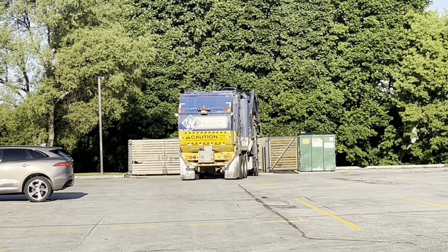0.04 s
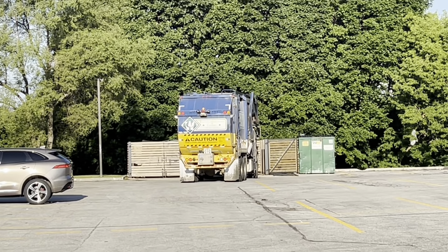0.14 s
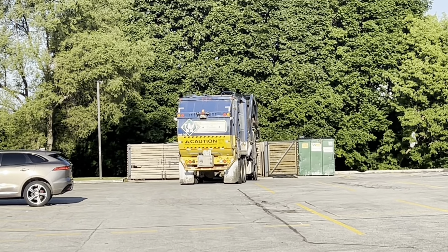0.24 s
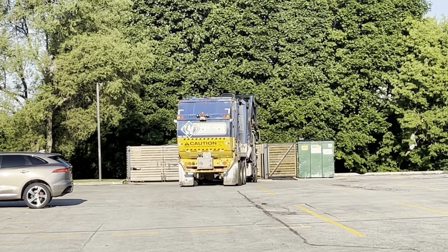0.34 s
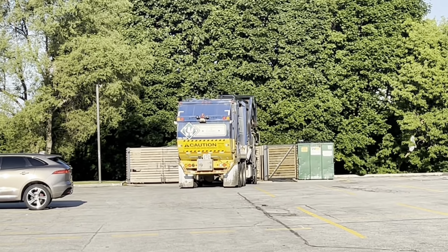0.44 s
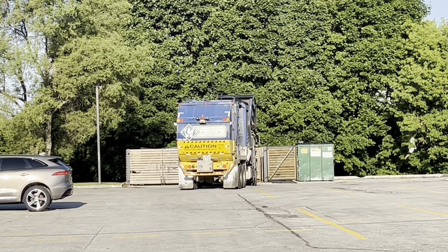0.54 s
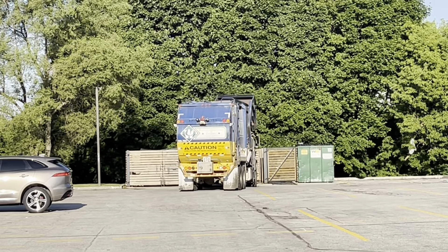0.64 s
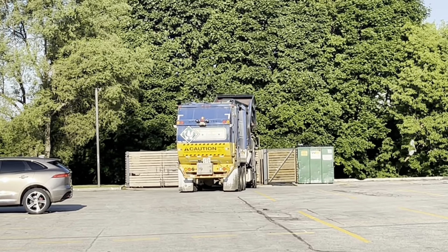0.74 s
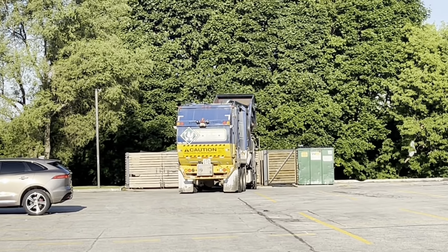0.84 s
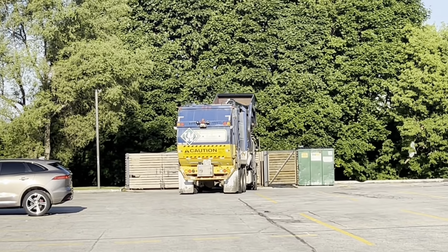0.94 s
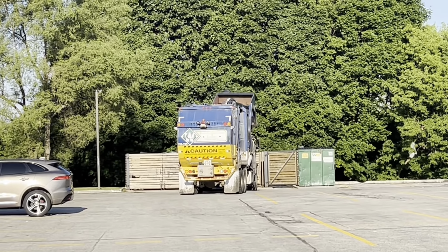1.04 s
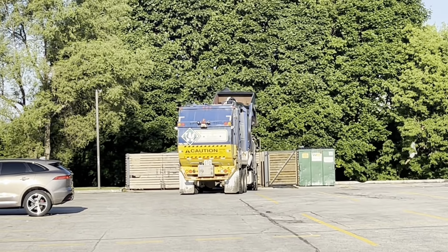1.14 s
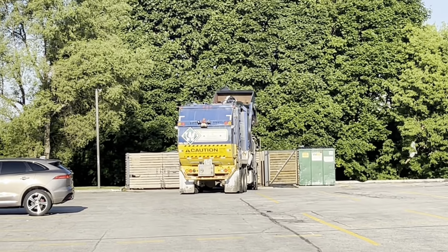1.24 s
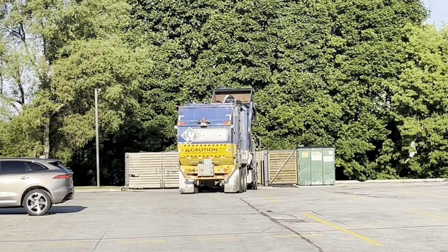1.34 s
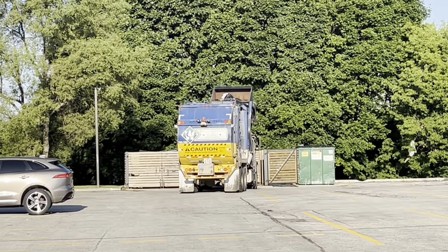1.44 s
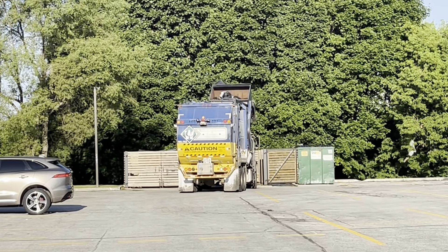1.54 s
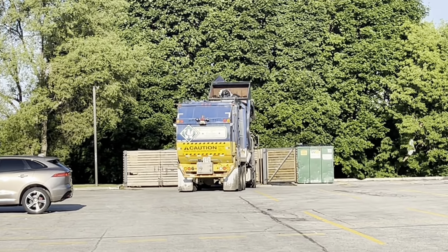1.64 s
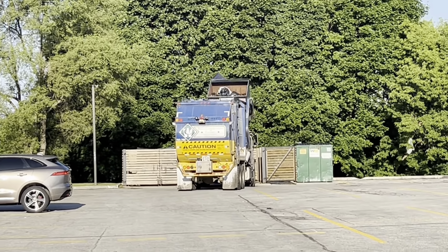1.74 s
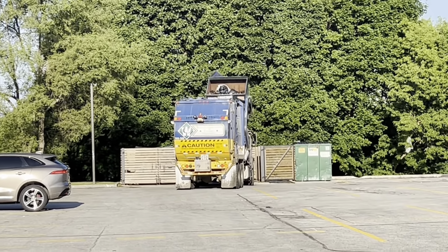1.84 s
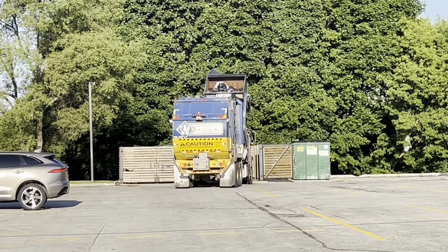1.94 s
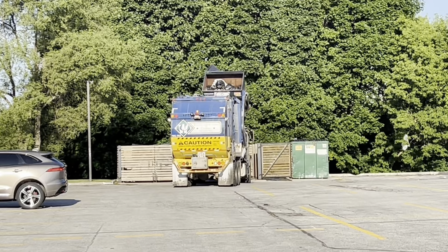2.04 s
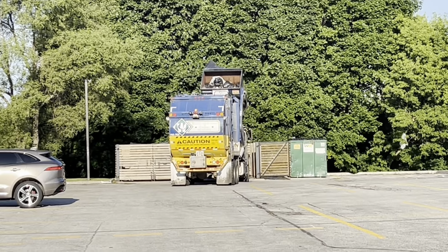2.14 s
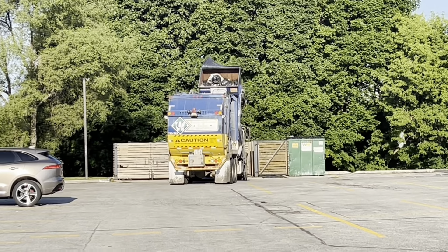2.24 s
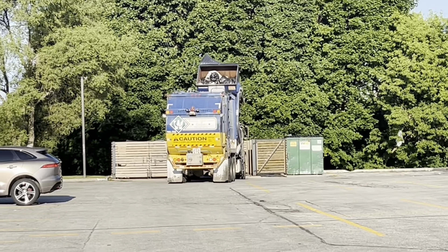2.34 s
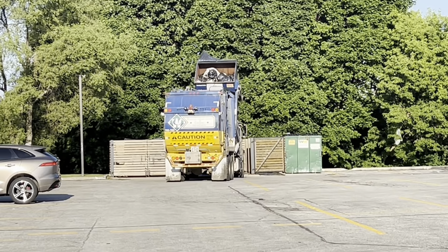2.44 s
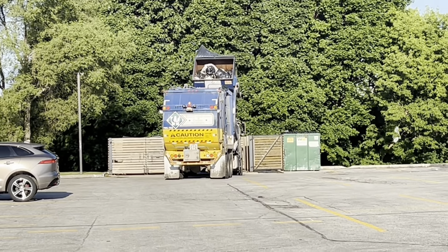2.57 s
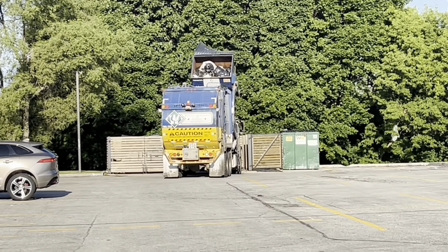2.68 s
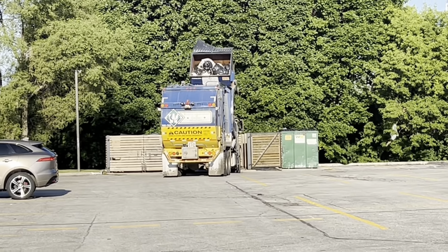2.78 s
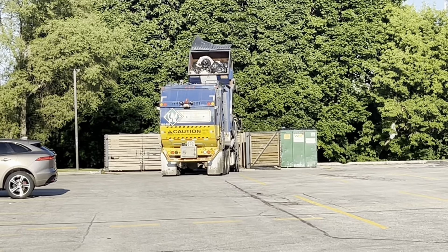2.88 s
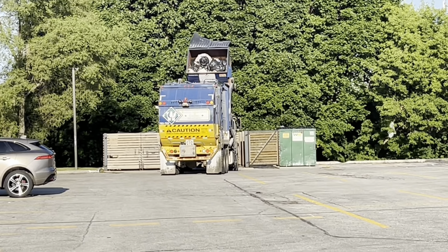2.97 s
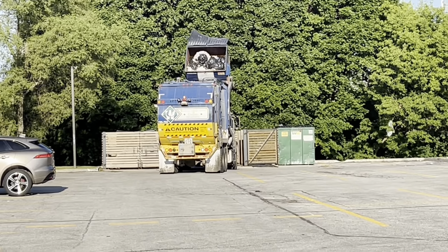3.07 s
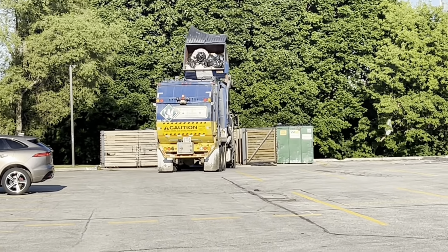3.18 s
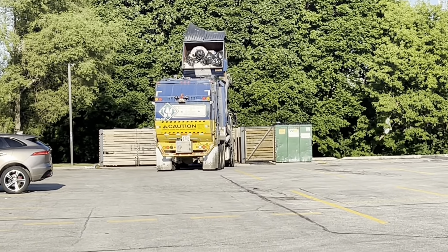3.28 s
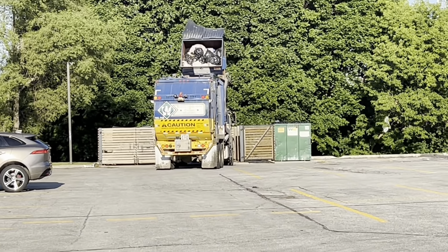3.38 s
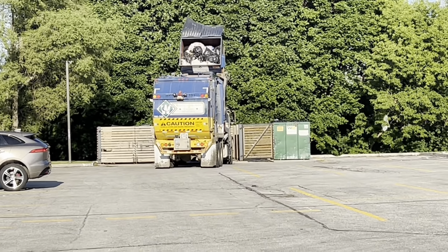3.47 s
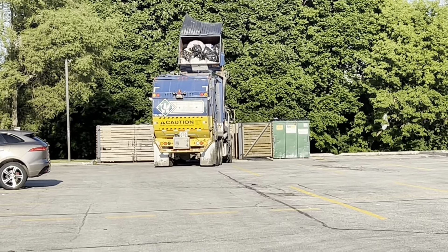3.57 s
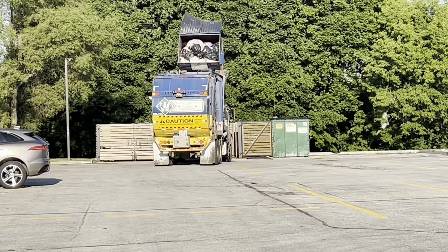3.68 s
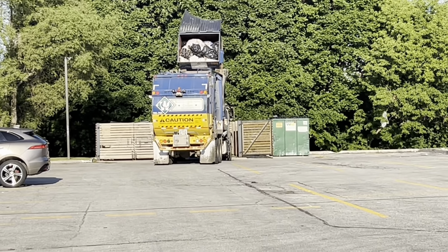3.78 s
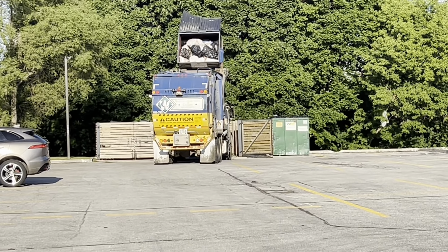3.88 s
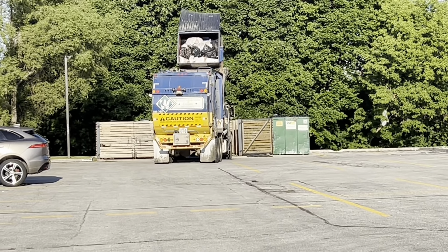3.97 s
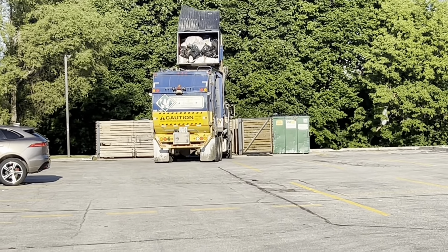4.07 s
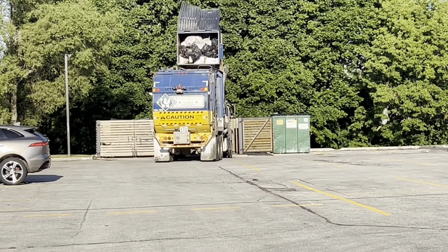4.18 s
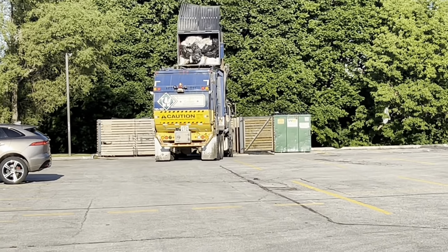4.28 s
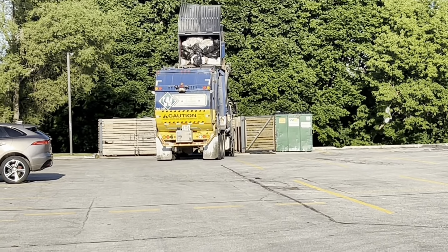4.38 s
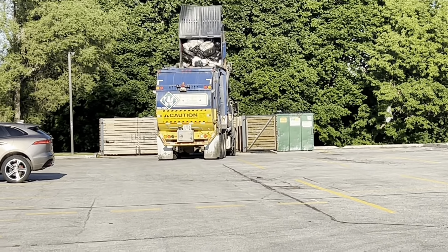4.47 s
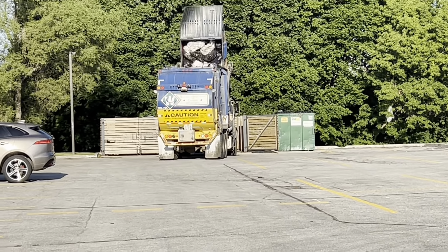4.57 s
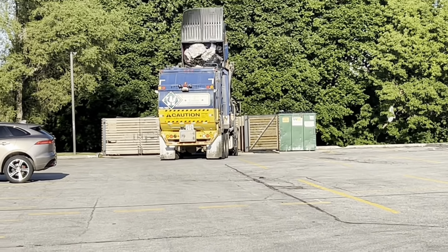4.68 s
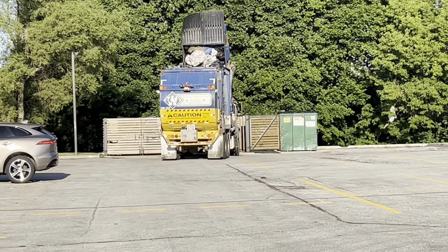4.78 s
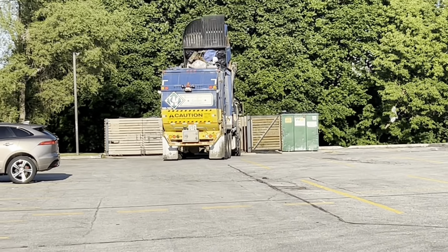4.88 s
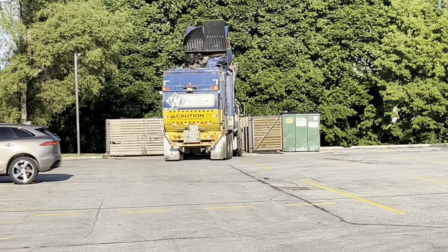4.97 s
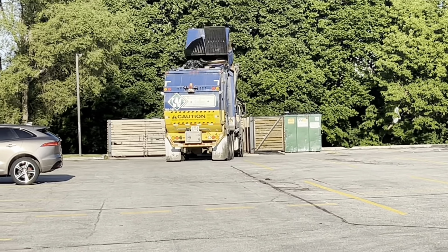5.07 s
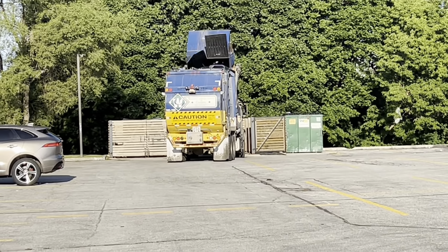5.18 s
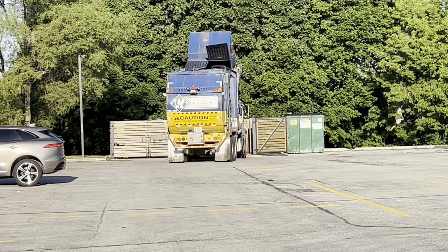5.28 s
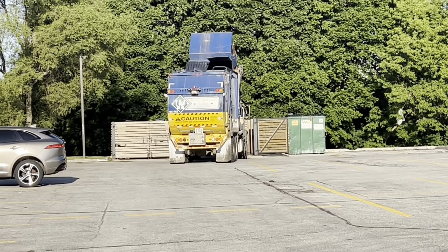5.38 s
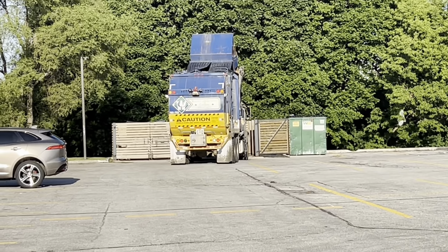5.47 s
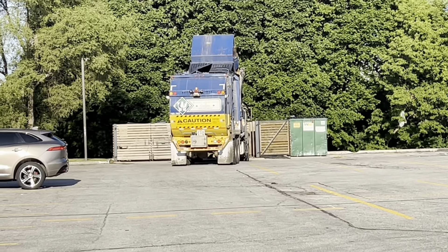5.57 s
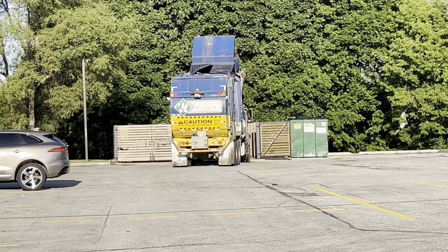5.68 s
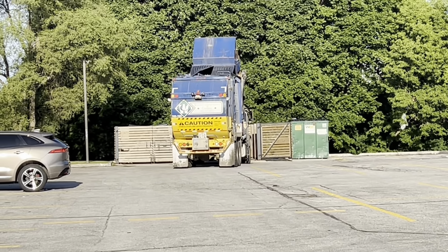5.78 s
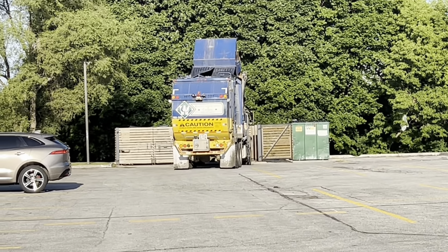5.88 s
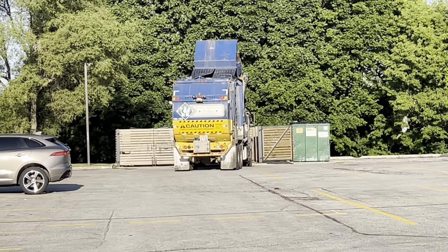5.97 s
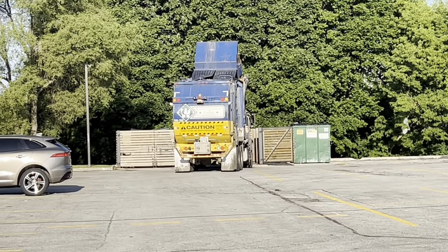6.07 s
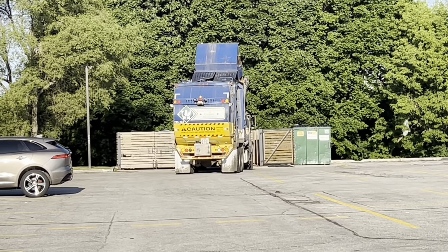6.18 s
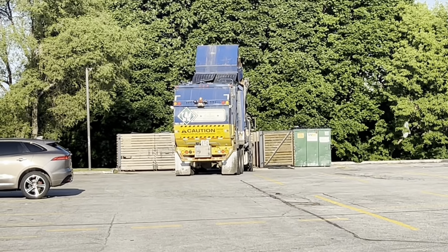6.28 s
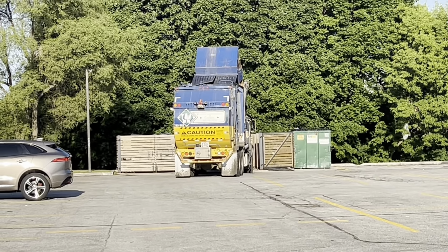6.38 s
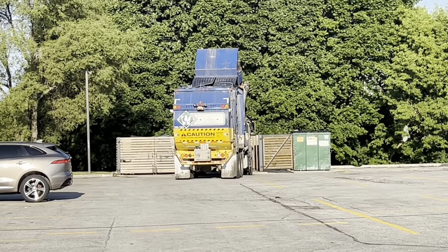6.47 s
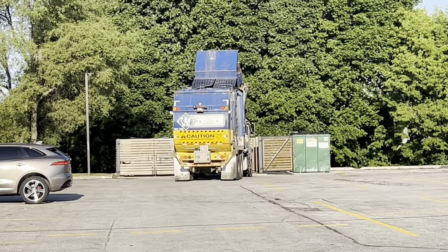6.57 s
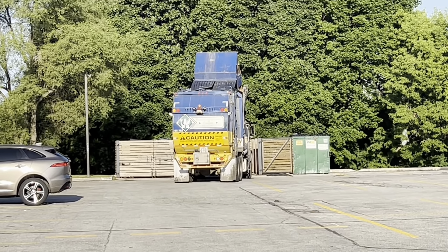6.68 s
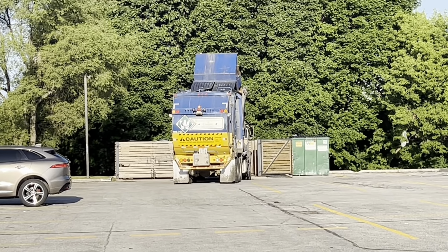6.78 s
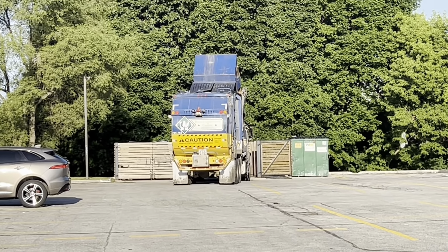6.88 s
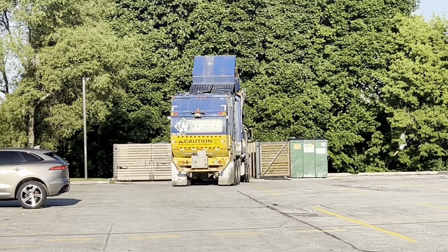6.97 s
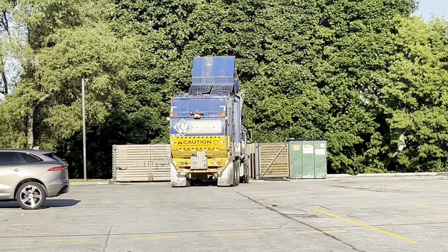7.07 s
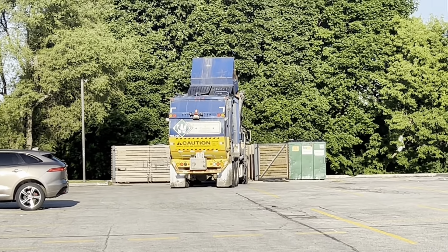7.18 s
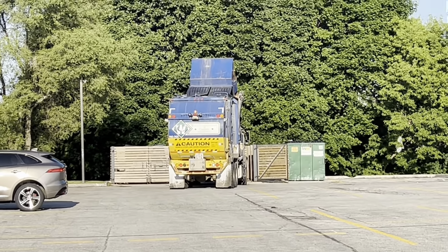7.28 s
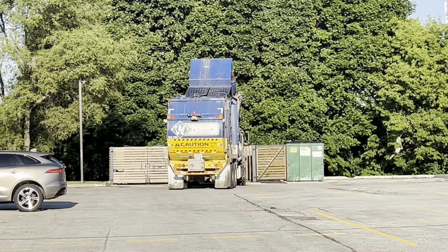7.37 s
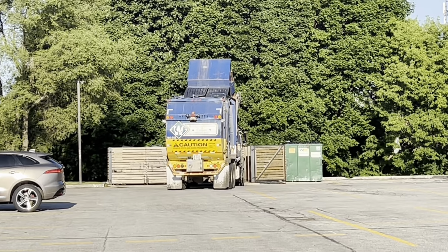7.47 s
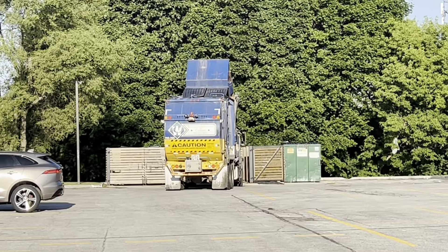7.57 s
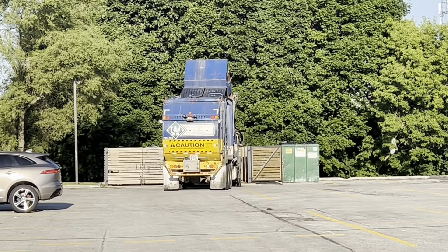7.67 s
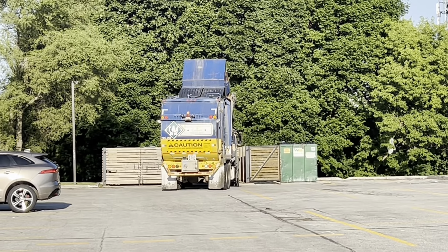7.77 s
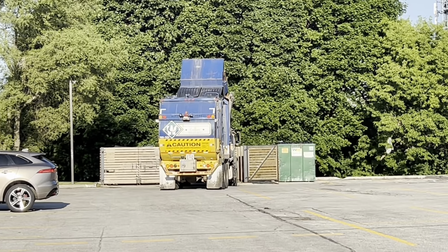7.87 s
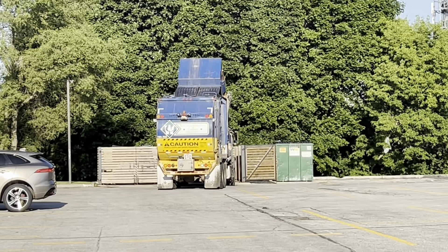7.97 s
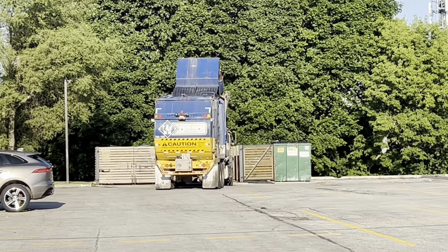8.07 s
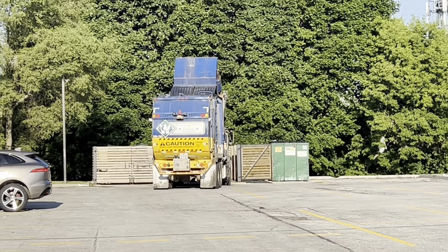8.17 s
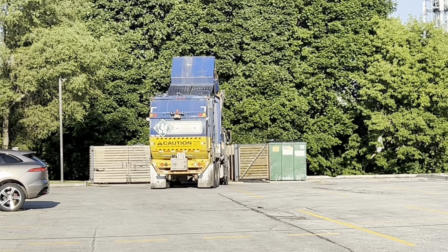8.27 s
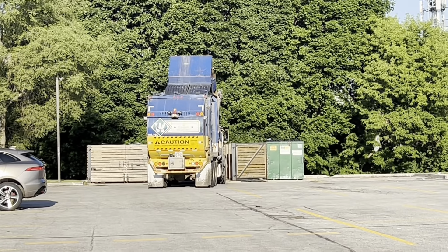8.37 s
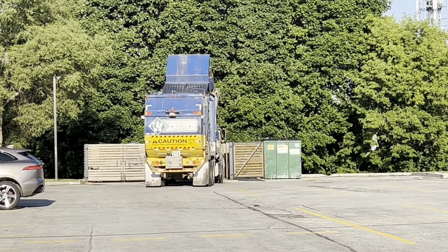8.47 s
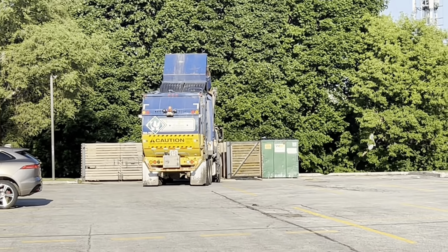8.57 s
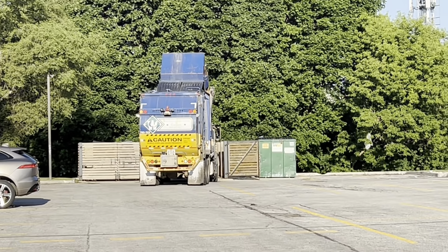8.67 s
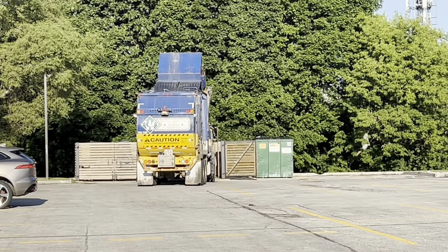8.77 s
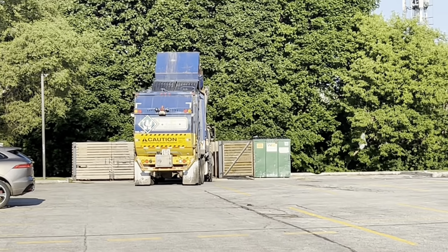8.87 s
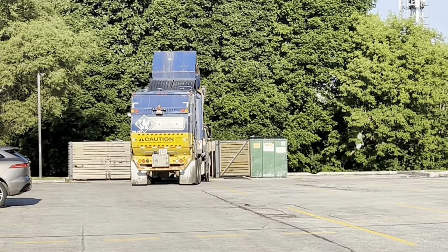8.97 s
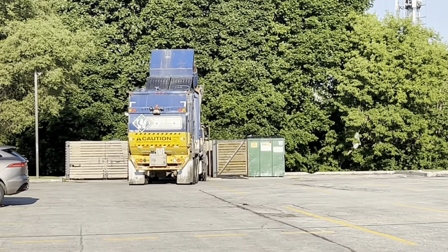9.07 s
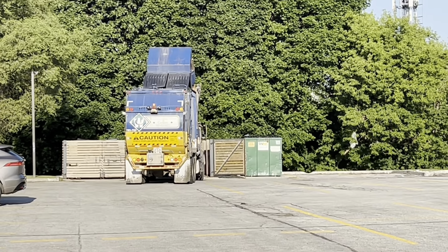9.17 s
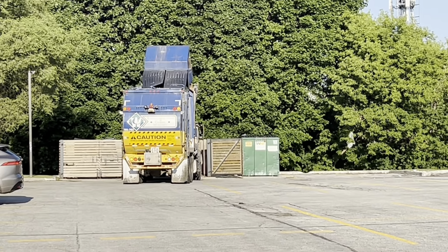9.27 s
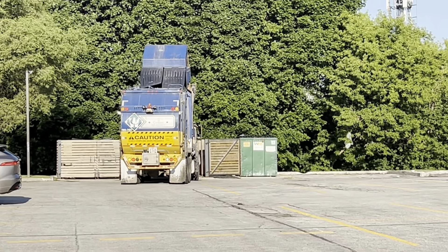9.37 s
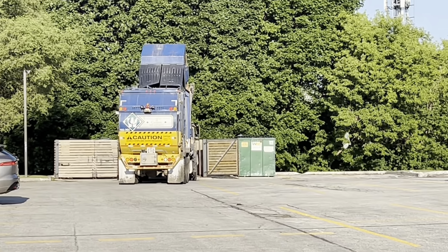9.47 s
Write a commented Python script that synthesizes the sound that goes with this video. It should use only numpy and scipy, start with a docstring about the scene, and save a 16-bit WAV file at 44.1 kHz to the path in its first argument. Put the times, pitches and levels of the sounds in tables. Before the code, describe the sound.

Phone capture outdoors facing a garbage truck: loud, rumbling diesel under load with body shudders, rasping stiff rails and short squeaks, thin valve hiss. A heavy boxy bang of the bin leads into a second, denser crash of lids, cans and scraps with ringing steel. Revs swell, then drop to soft idle with faint bird calls and small dry taps close by, ending on rising revs and sharp metallic clicks.

```python
"""A diesel garbage truck in a car park works its engine to lift a steel bin over its roof; rollers jerk in the rails.
Oil hisses through a valve, the load shifts, the bin bangs on the hopper, lids slam and rubbish slides out.
The engine speeds up, then drops to idle; a small bird calls; at the end the engine rises and steel clanks again.
Engine: filtered noise and tones locked to its firing. Steel: noise bursts and decaying modes. Rubbish: grains and
struck modes. Squeals and bird: gliding sines. Taps close by and sharp clicks in the closing steel clatter: resonated
noise bursts."""
import sys
import numpy as np
from scipy import signal
from scipy.fft import rfft, irfft, next_fast_len
from scipy.io import wavfile
from scipy.ndimage import uniform_filter1d

SR = 44100
rng = np.random.default_rng(int(sys.argv[2]) if len(sys.argv) > 2 else 0)


def waveform_to_disk(signal):
    """Save audio, clipped to [-1, 1], as 16-bit WAV at the path in sys.argv[1]."""
    frames = np.transpose(np.atleast_2d(signal))
    scaled = np.clip(frames, -1, 1) * 32767
    samples = np.round(scaled).astype(np.int16)
    wavfile.write(sys.argv[1], SR, samples)


N = 420273
T = np.arange(N) / SR

# relative spectrum of sliding rubbish [frequency_hz, density_db_per_hz]
RUBBISH_SPECTRUM = [(200, -10), (600, 1), (1300, 13), (1550, 6.5), (2250, 12.5), (3000, -1), (4900, 2),
                    (6500, -11.5), (8500, -28), (12000, -41), (16000, -52)]
# modes of the hopper and the lids that fall on it [frequency_hz, relative_level_db, t60_s]
HOPPER_MODES = [(915, -12, .2), (1130, -9, .2), (1215, -5, .2), (1272, -4, .22), (1368, -7, .25),
                (1660, -12, .2), (1830, -10, .2), (2120, -8, .2), (2257, -7, .3), (2490, -10, .2),
                (2650, -11, .2), (3610, -15, .25), (3820, -16, .25), (3985, -14, .25), (4720, -13, .25),
                (4935, -14, .25), (5490, -19, .2), (6210, -22, .2), (6510, -19, .2)]


def amp(db):
    """Logarithmic level: decibels to an amplitude ratio."""
    return 10 ** (np.asarray(db) / 20)


def unit(x):
    """Power normalisation: scale to rms 1."""
    return x / np.sqrt(np.mean(x ** 2) + 1e-18)


def colour(x, points):
    """Minimum-phase filtering through (Hz, dB) points, falling 20 dB per octave beyond the last."""
    size = 8192
    hz, db = np.transpose(points)
    octave = np.log2(np.arange(size // 2 + 1) * SR / size + 1)
    gain_db = np.interp(octave, np.log2(hz), db) - 20 * np.maximum(octave - np.log2(hz[-1]), 0)
    # folding the cepstrum onto positive times makes the response causal
    cepstrum = irfft(np.log(amp(gain_db)))
    cepstrum[1:size // 2] *= 2
    cepstrum[size // 2 + 1:] = 0
    response = irfft(np.exp(rfft(cepstrum)))
    return signal.oaconvolve(x, response)[:len(x)]


def resonance(x, hz, q):
    """Simple resonance: a band-pass with gain 1 at its centre."""
    return signal.lfilter(*signal.iirpeak(min(hz, SR / 3), max(q, .5), fs=SR), x)


def treble(x, db, corner_hz=3500):
    """First-order shelving: lift or lower what lies above the corner."""
    high = signal.lfilter(*signal.butter(1, corner_hz, "high", fs=SR), x)
    return x + (amp(db) - 1) * high


def noise(count=N):
    """White noise: equal mean power at every frequency."""
    return rng.standard_normal(count)


def walk(rate):
    """Band-limited chance: smoothed random steps, rate per second, with a spread near 1."""
    k = max(int(SR / rate), 1)
    return 1.16 * uniform_filter1d(noise()[np.arange(N) // k], k)


def swell(s, length, rise_s, fall_s):
    """Exponential envelope: builds up from s, holds for its length and dies away."""
    age = np.maximum(T - s, 0)
    fall = np.minimum(np.maximum(age - length, 0) / fall_s, 20)
    return (1 - np.exp(-age / rise_s)) * np.exp(-fall)


def spread(mid, side, width):
    """Mid-side stereo: direct sound plus coloured, unrelated reflections of opposite sign at the two ears."""
    return mid + colour(side, width) * np.array([[1], [-1]])


def engine():
    """Periodic excitation: firings drive exhaust and block, pump tones keep in step, and level follows speed."""
    # speed of the six-cylinder diesel [time_s, firing_hz]
    speed = [(0, 54.8), (1.3, 54.7), (2.2, 55.8), (3.3, 56.8), (4.2, 55.5), (4.7, 55.5), (5.15, 63.5),
             (5.45, 62), (5.8, 48), (6.2, 35.3), (8.8, 35.0), (9.1, 37), (9.53, 47)]
    # engine and pump tones [multiple_of_firing_rate, relative_level_db]
    orders = [(1, -2), (2, -10), (3.435, -6), (4.5, -15), (5.17, -12.5), (6, -5.5), (7, -14.5),
              (10.2, -22.5), (10.5, -24.5), (12, -20.5), (13.55, -22), (21.4, -25), (22.5, -25.5)]
    # relative spectra of exhaust drone, body rumble, combustion clatter, oil [frequency_hz, density_db_per_hz]
    drone_spectrum = [(90, -11.5), (140, -1), (190, -2), (215, -2), (250, 1.5), (300, -5.5), (370, -12),
                      (450, -14), (560, -26), (900, -65.5)]
    rumble_spectrum = [(20, -48), (35, 0.5), (52, 11.5), (70, 12), (110, 4.5), (140, -11.5), (200, -4.5),
                       (400, -65.5)]
    clatter_spectrum = [(250, -9), (430, -1), (510, -3), (580, 1.5), (650, -1.5), (750, 0), (980, -7.5),
                        (1250, -6.5), (1430, -10), (1650, -8.5), (1900, -10), (3200, -18), (5000, -33.5),
                        (8000, -46), (11000, -69)]
    oil_spectrum = [(1000, -3.5), (2500, -1.5), (4000, 0.5), (6000, -5.5), (8000, -15), (12000, -24.5),
                    (16000, -37.5)]
    # spread of the engine between the ears [frequency_hz, side_minus_mid_db]
    engine_width = [(60, -21.5), (200, -17.5), (380, -8.5), (700, -3.5), (1000, -1.5), (1500, 2),
                    (2000, -9), (3000, -17.5), (4600, -20), (8000, -16), (13000, -17)]

    hz = np.interp(T, *np.transpose(speed))
    octaves = np.log2(hz / 55.5)  # from working speed
    slope_hz_s = np.gradient(hz) * SR
    # extra fuel while speeding up; tones die away off the throttle
    pull_db = 0.0872 * uniform_filter1d(np.maximum(slope_hz_s, 0), SR // 5)
    overrun_db = .2 * uniform_filter1d(np.minimum(slope_hz_s, 0), SR // 5)
    exhaust_db = 10.5 * octaves + pull_db
    clatter_db = -37.5 + 6 * octaves + pull_db
    hiss_db = -55 + 14 * octaves
    hum_db = -40.5 - 1.5 * octaves
    rocking, buzzing = shudders()
    # exhaust drone added by a shudder under load
    strain = rocking * amp(-3 + 10.5 * octaves)

    turns = np.cumsum(hz * (1 + 0.0028 * walk(9))) / SR  # counted in firings
    firing, phase = turns.astype(int), turns % 1
    # six unequal cylinders, with a random part at each firing
    cylinder_db = np.array([0.079, 0.29, 0.63, 0.52, 0.23, -0.47])
    strength = amp(cylinder_db[firing % 6] + 0.73 * noise()[firing])
    pulses = unit(np.diff(firing, prepend=0) * strength)
    knock = unit(strength * (np.exp(-phase) + 7.7))  # mostly steady, with a decay after each firing
    tones = sum(amp(db + 3 * walk(5)) * np.sqrt(2) * np.sin(2 * np.pi * k * turns + .6 * walk(9))
                for k, db in orders)
    # the pump's whine swells with a shudder
    whine = amp(-7.5) * strain * np.sqrt(2) * np.sin(2 * np.pi * 3.435 * turns + walk(7.8))

    def roar(thump):
        """Source and filter: drone, rumble, panel hum, clatter and oil hiss along one path."""
        drone_level = np.hypot(amp(exhaust_db - 27.5), strain)
        drone = drone_level * unit(colour(knock * noise() + thump, drone_spectrum))
        rumble_level = np.hypot(amp(-29), rocking)
        rumble = rumble_level * unit(colour(knock * noise() + thump, rumble_spectrum))
        panels = resonance(resonance(noise(), 103.5, 2.1), 103.5, 2.1)
        hum = np.hypot(amp(hum_db), buzzing) * unit(panels)
        clatter = amp(clatter_db) * unit(colour(knock * noise(), clatter_spectrum))
        hiss = amp(hiss_db + 0.85 * walk(30)) * unit(colour(noise(), oil_spectrum))
        return drone + rumble + hum + clatter + hiss + valve()

    direct = roar(0.19 * pulses) + amp(exhaust_db - 32 + overrun_db) * tones + whine
    return spread(direct, roar(0), engine_width)


def shudders():
    """Transient vibration on springs: strength of the extra rumble and panel hum while the body rocks."""
    # rocking of the body [start_s, length_s, rumble_db, panel_hum_db]
    rocks = [(0, 0.15, -28.5, -46), (1.43, 0.34, -23, -25), (1.89, 0.3, -24.5, -46),
             (2.523, 0.26, -37.5, -24.5), (3.237, 0.32, -26, -27), (4.098, 0.13, -28, -51),
             (4.61, 0.54, -47, -25), (5.603, 0.59, -29.5, -34), (6.194, 0.68, -26.5, -24.5),
             (7.53, 1.15, -37, -29), (8.847, 0.77, -30, -56)]
    shapes = np.array([swell(s, length, rise_s=.045, fall_s=.11) for s, length, _, _ in rocks])
    return amp(np.transpose(rocks)[2:]) @ shapes


def valve():
    """Turbulent flow noise: a thin hiss of oil throttled through the tipping valve."""
    # flow through the valve [start_s, length_s, level_db]
    strokes = [(3.196, .45, -57.5), (3.625, 1.8, -54.5), (8.895, .7, -54.5)]
    # relative spectrum of the hiss [frequency_hz, density_db_per_hz]
    hiss_spectrum = [(2000, -6.5), (4200, 2.5), (6000, -2), (8000, -12), (12000, -15.5), (16000, -18)]
    flow = sum(amp(db) * swell(s, length, rise_s=.17, fall_s=.12) for s, length, db in strokes)
    return flow * unit(colour(noise(), hiss_spectrum))


def clanks():
    """Superposition: the blows, rubbish, scrapes and squeals of the lift, the bin and the hopper."""
    # modes of the steel bin [frequency_hz, relative_level_db, t60_s]
    bin_modes = [(140, 2, .55), (291, -7, .6), (430, -12, .6), (592, -16, .9), (745, -7, .7), (825, -1, .7),
                 (848, -6, .5), (1061, -14, .8), (1129, -9, .7), (1282, -6, .6), (1366, -6, .6),
                 (1645, -14, .9), (2211, -6, .8), (2255, -11, .9), (2570, -10, .7), (2665, -17, .6),
                 (3157, -16, .7), (3295, -10, .6), (3996, -20, .8), (4335, -20, .9), (4723, -17, .7),
                 (4930, -15, .6), (5035, -12, .4), (5104, -14, .5), (5215, -12, .5), (6110, -20, .4)]
    bin_blows = blows(bangs(), bin_modes, detune=.008, ring_db=-15, chatter_db=2.8, panel_tail_db=-11)
    hopper_blows = blows(slams(), HOPPER_MODES, detune=.015, ring_db=-9, chatter_db=3.2, panel_tail_db=-8)
    return bin_blows + hopper_blows + rubbish() + rails() + squeals()


def bangs():
    """Nonlinear impact: heavier bangs of the bin are brighter; columns as blows() takes them."""
    # the whole bin against the lift and the hopper [start_s, level_db, boom_db, panel_hz, fade_s]
    bin_hits = [(2.59, -61, 33, 800, .047), (4.609, -19.5, 3, 820, 0.021), (4.619, -27, 15.5, 1240, 0.024),
                (4.646, -21.5, 0, 816, .024), (4.662, -37, 7, 1320, 0.016), (4.698, -29, 9, 2230, 0.023),
                (4.737, -34, 16.5, 740, 0.032), (4.795, -34, 8, 915, 0.009), (5.088, -74, 4, 1300, .047),
                (9.407, -39, 15.5, 1210, 0.025)]
    panel_db, tail_db = -0.5, -1
    # treble rises 2 dB per dB of strength
    return [(s, db, boom_db, 0.5 + 2 * (db + 20.5), hz, panel_db, fade_s, tail_db)
            for s, db, boom_db, hz, fade_s in bin_hits]


def slams():
    """Short impacts of lids, latches and heavy pieces on the hopper; columns as blows() takes them."""
    # slams [start_s, level_db, treble_db, panel_hz, panel_db, fade_s]
    hopper_hits = [(4.144, -41.5, 14, 2200, 1, 0.014), (4.242, -39.5, 8, 2250, 1, .008),
                   (4.3, -48, -4, 1390, 11.5, .02), (4.65, -22, -3, 1310, 2, 0.013),
                   (4.792, -23.5, 0, 1320, -1, 0.011), (4.859, -32, 3, 1340, 2, .012),
                   (4.941, -41, 9, 4400, 5, 0.0059), (5.453, -25, 0, 1010, 4, .01),
                   (5.46, -21, -10, 1335, 9, 0.012), (5.478, -30, -5, 1050, 3, .007),
                   (5.493, -22, -4, 1980, 1, 0.013), (5.511, -27, 7, 1900, 2, .005),
                   (5.642, -23.5, -4, 1230, 4, 0.026), (5.647, -24, 8, 2600, 3, 0.0037),
                   (5.654, -19, 12.5, 2340, 2.5, 0.0065), (5.678, -26, 15, 2100, -1, 0.025),
                   (5.697, -26, 9, 2230, 0, .012), (5.733, -27, 5, 2230, 5, 0.0069),
                   (5.748, -22.5, 3, 1270, 2.5, 0.0061), (5.777, -26.5, 5, 2190, 0, 0.012),
                   (5.798, -27, 3, 1350, 3, .006), (5.876, -28.5, 6, 2450, -2, 0.0053),
                   (5.916, -28, 2, 2140, -8, .012), (5.947, -31, -2, 1330, 6, 0.0045),
                   (6.123, -43, -2, 1350, 5, .007), (9.282, -30.5, 8, 2490, 1, .006),
                   (9.287, -32, 12, 1880, 11, 0.0053), (9.296, -28.5, 8, 2250, 6.5, .005),
                   (9.299, -33, -5, 1190, 9, .006), (9.322, -32, -6, 1800, 12.5, 0.0054),
                   (9.324, -40, -5, 2800, 9, 0.0049), (9.339, -43, 12, 6500, 1, .007),
                   (9.408, -30, -8, 1250, -1, .006), (9.427, -36, -8, 1150, 6, .009),
                   (9.463, -39, 1, 3320, 6, .006), (9.488, -34, -1, 2300, 2, .006),
                   (9.509, -29.5, -5, 1200, 9, 0.0046), (9.523, -35, 10, 5950, 4, .015)]
    boom_db, tail_db = 7, -19
    return [(s, db, boom_db, treble_db, hz, panel_db, fade_s, tail_db)
            for s, db, treble_db, hz, panel_db, fade_s in hopper_hits]


def blows(hits, body, detune, ring_db, chatter_db, panel_tail_db):
    """Impact excitation: steel chatters, the struck panel clanks, the hollow booms and the modes ring on."""
    # relative spectra of steel crash and hollow boom [frequency_hz, density_db_per_hz]
    steel_spectrum = [(150, -27.5), (350, -15), (560, 3), (820, 8.5), (1000, 4.5), (1300, -1.5),
                      (1500, -18.5), (1750, 2), (2300, -6), (3000, -4.5), (5200, -7), (7000, -19),
                      (12000, -27.5), (16000, -43.5)]
    boom_spectrum = [(30, -23.5), (60, 1), (100, 0), (145, 8), (200, 3), (290, -3), (450, -7), (900, -53)]
    # how a heavy crash drives the walls [frequency_hz, gain_db]
    crash_contact = [(140, -25), (500, -0.5), (820, 5), (1300, 3.5), (2300, 3.5), (5000, -1), (8000, 3)]

    out, count = np.zeros(N + 2 * SR), int(SR * 5 / 4)
    t = np.arange(count) / SR
    uneven = amp(chatter_db * walk(250)[:3 * count])
    crackle = unit(colour(noise(3 * count), steel_spectrum) * uneven)
    chatter = crackle + walls(colour(noise(len(crackle)), crash_contact), body)
    hollow = colour(noise(len(crackle)), boom_spectrum)
    modes = ringing(body, t)
    tail, boom_tail = amp(-60 * t / 1.005), amp(-60 * t / .9)  # divisors are t60 in s
    rise, boom_rise = 1 - np.exp(-t / .0022), 1 - np.exp(-t / .0058)
    low_mode = np.array(body)[:, 0] < 700
    for s, db, boom_db, treble_db, panel_hz, panel_db, fade_s, tail_db in hits:
        span = slice(int(s * SR), int(s * SR) + count)
        start = rng.integers(len(chatter) - count)
        crash = treble(unit(chatter[start:start + count]), treble_db)
        panel = amp(panel_db) * unit(resonance(noise(count), panel_hz, 14))
        boom = amp(boom_db) * boom_rise * unit(hollow[start:start + count])
        # random mode phases stand for the point of contact; a boom under 3 dB stirs low modes less
        push_db = ring_db + low_mode * min(boom_db - 3, 0)
        push = amp(push_db) * np.exp(2j * np.pi * rng.random(len(body)))
        contact = (crash + panel + boom) * np.exp(-t / fade_s)
        after = amp(tail_db) * ((crash + amp(panel_tail_db) * panel) * tail + boom * boom_tail)
        # loose panels flex and ring at a slightly different pitch each time
        ring = np.interp(t * (1 + detune * rng.standard_normal()), t, np.imag(push @ modes))
        out[span] += amp(db) * rise * (contact + after + ring)
    return out[:N]


def rubbish():
    """Granular excitation: bags, cans and scraps slide down ringing steel, one load after another."""
    # loads tumbling out [start_s, length_s, level_before_treble_trim_db, treble_db]
    pours = [(4.27, 0.43, -60, -15), (4.804, 1, -53, 15), (5.368, 0.18, -37.5, -4),
             (5.424, 0.094, -37.5, 18), (5.667, 0.22, -29.5, 5.5), (5.92, 0.1, -35, -1),
             (6.037, 0.15, -56, -17.5), (9.33, 0.03, -52, 8), (9.45, .1, -43, -20)]
    # how a light scrap drives the walls [frequency_hz, gain_db]
    scrap_contact = [(140, -25.5), (800, -2), (1300, -6), (2300, 2), (5000, 2), (8000, 2)]
    grit = debris(rate=1000, spread_db=2.5, ring_s=0.0031, clink_share=0.25) * amp(1.1 * walk(60))
    ring = amp(-2.5) * walls(colour(grit, scrap_contact), HOPPER_MODES)
    scraps = unit(unit(colour(grit, RUBBISH_SPECTRUM)) + ring + rattle())
    out = np.zeros(N)
    for s, length, db, bright_db in pours:
        level = amp(db - 0.7 * bright_db)  # trims brighter loads
        out += level * swell(s, length, rise_s=.029, fall_s=.091) * treble(scraps, bright_db)
    return out


def rattle(rate=85, ring_s=.014, crack_s=0.003, crack_db=2, spread_db=3.5):
    """Modal excitation: cans and bottles strike at random; each stirs its own mix of damped modes."""
    t, out = T[:SR // 12], np.zeros(N + SR)
    modes = ringing(HOPPER_MODES, t) * np.exp(-t / ring_s)
    crack = amp(crack_db) * unit(colour(noise(len(t)), RUBBISH_SPECTRUM)) * np.exp(-t / crack_s)
    for when, size, *mix in rng.random((int(rate * N / SR), 2 + len(HOPPER_MODES))):
        start = int(when * N)
        ring = (2 * np.array(mix) - 1) ** 3 @ modes.imag
        out[start:start + len(t)] += amp(-spread_db * np.log(size + .1)) * (crack + ring)
    return unit(out[:N])


def rails():
    """Stick-slip friction: stiff rollers move in uneven jerks, each a rasping scrape that rings the rails."""
    # slips of the rollers [start_s, level_db, treble_db]
    jerks = [(1.408, -43.5, 2), (1.455, -47, 0), (1.491, -33.5, -1.5), (1.545, -37, -3), (1.585, -33, 2),
             (1.625, -39, 2), (1.683, -35.5, 1), (1.735, -36, 6), (1.81, -36.5, 2), (1.882, -38.5, 3),
             (1.952, -39.5, 0)]
    # relative spectrum of the scrape [frequency_hz, density_db_per_hz]
    scrape_spectrum = [(500, 2), (1200, 5), (1550, 0), (2500, 2), (2900, -2), (3500, -1.5), (4200, -4.5),
                       (5200, -3), (6500, -9.5), (8500, -20), (12000, -28.5), (16000, -36)]
    # modes of the rails [frequency_hz, relative_level_db, t60_s]
    rail_modes = [(1240, -2, .3), (1900, -6, .3), (2380, -1, .2), (2560, -2, .2), (2820, 0, .2),
                  (2960, -1, .2), (3930, -6, .3), (4090, -7, .3), (4550, -8, .3), (5060, -7, .2),
                  (5210, -7, .2), (5930, -11, .3)]
    scrape = debris(rate=480, spread_db=2.0, ring_s=0.0019, clink_share=0.3)
    ringing_scrape = unit(colour(scrape, scrape_spectrum)) + amp(-7) * walls(noise(), rail_modes)
    rasp = unit(amp(1.9 * walk(260)) * ringing_scrape)  # stutter
    power = np.array([(amp(db) * swell(s, .0097, rise_s=.0061, fall_s=.088)) ** 2 for s, db, _ in jerks])
    total = power.sum(axis=0)
    # where jerks overlap, the brightness is their mean weighted by power
    bright_db = np.array(jerks)[:, 2] @ power / (total + 1e-18)
    return np.sqrt(total) * treble(rasp, bright_db, corner_hz=5500)


def squeals(wobble=0.04):
    """Frictional self-oscillation: brief rough whistles where a dry joint or roller binds."""
    # steel squealing on steel [start_s, length_s, start_hz, end_hz, level_db]
    whistles = [(1.407, 0.033, 5220, 5340, -46), (1.494, 0.039, 5100, 5240, -39),
                (1.81, 0.035, 5200, 5260, -41), (1.669, 0.046, 3050, 2800, -36),
                (1.955, .03, 2390, 2600, -39), (3.917, 0.11, 4370, 4330, -46),
                (5.492, 0.012, 1930, 2110, -27), (9.32, 0.021, 1906, 1590, -29),
                (9.384, .01, 6750, 6700, -42)]
    out, unsteady = np.zeros(N), 1 + wobble * walk(900)
    for s, length, start_hz, end_hz, db in whistles:
        u = np.linspace(0, 1, int(length * SR))
        span = slice(int(s * SR), int(s * SR) + len(u))
        hz = (start_hz + (end_hz - start_hz) * u) * unsteady[span]
        out[span] += amp(db) * np.sin(np.pi * u) * np.sin(2 * np.pi * np.cumsum(hz) / SR)
    return out


def debris(rate, spread_db, ring_s, clink_share):
    """Shot noise: a bed of tiny impacts with short clinks in it, each clink at its own pitch."""
    sizes_db = spread_db * np.minimum(rng.exponential(size=N), 4)
    impacts = (rng.random(N) < 6000 / SR) * noise() * amp(sizes_db)
    t = T[:SR // 100]
    when, pitch, size = rng.random((int(rate * N / SR), 3)).T[:, :, None]
    level = amp(-spread_db * np.log(size + .05))
    rings = level * np.exp(-t / ring_s) * np.sin(2 * np.pi * (700 + 9000 * pitch) * t)
    places = (when * N).astype(int) + np.arange(len(t))
    clinks = np.bincount(places.ravel(), rings.ravel(), N)[:N]
    return unit(unit(impacts) + 1.8 * noise() + clink_share * unit(clinks))


def walls(x, body):
    """Forced resonance: a body's modes colour the sound; each comes and goes as the contact moves."""
    place = T[:len(x)] * 35  # level steps per second
    steps = np.arange(int(place[-1]) + 2)
    out = np.zeros(len(x))
    for hz, db, t60 in body:
        wander_db = 4 * np.clip(noise(len(steps)), -1.5, 1.5)
        level = np.interp(place, steps, amp(db + wander_db))
        # a load damps the walls: bandwidth times the free t60 is 10
        out += level * resonance(x, hz, hz * t60 / 10)
    return unit(out)


def ringing(body, t):
    """Free vibration: one exponentially decaying complex tone for each mode of a body."""
    hz, db, t60 = np.transpose(body)[:, :, None]
    return amp(db - 60 * t / t60) * np.exp(2j * np.pi * hz * t)


def ticks(fade_s=0.00046, q=0.82):
    """Damped impulse response: tiny dry clicks, from taps close by and within the closing steel clatter."""
    # taps close by, then sharp clicks of the closing steel clatter [start_s, peak_db, frequency_hz]
    clicks = [(4.309, -30, 4500), (4.314, -34, 4000), (4.343, -24, 4500), (4.3435, -22, 1880),
              (5.413, -23, 4800), (5.455, -27, 10000), (5.488, -29, 10500), (6.306, -20, 346),
              (6.817, -24.5, 850), (8.2138, -19, 990), (8.2151, -25, 318), (9.153, -33, 4500),
              (9.221, -31, 3000), (9.254, -28, 6950), (9.2565, -22, 2900), (9.267, -33, 4500),
              (9.289, -32, 7500), (9.297, -27, 6500), (9.31, -31, 5500)]
    out, t = np.zeros(N), np.arange(SR // 50) / SR
    for s, db, hz in clicks:
        tick = resonance(resonance(noise(len(t)) * np.exp(-t / fade_s), hz, q), hz, q)
        tick = signal.lfilter(*signal.butter(2, min(2 * hz, SR / 3), fs=SR), tick)
        out[int(s * SR):int(s * SR) + len(t)] += amp(db) * tick / np.abs(tick).max()
    return out


def bird(echo_db=-37, echo_s=0.073):
    """Frequency modulation: quick upward flicks and arched whistles, blurred by diffuse echoes from leaves."""
    # calls [start_s, level_db]
    calls = [(6.741, -55), (7.452, -60), (8.962, -56)]
    # notes of one call [after_call_start_s, length_s, start_hz, middle_hz, end_hz, relative_level_db]
    notes = [(0, .01, 6200, 7300, 9200, -1), (0, .028, 3500, 4750, 4800, -1),
             (.022, .031, 4900, 4250, 3650, 1), (.059, .014, 5600, 6400, 7600, -4),
             (.066, .042, 3500, 4250, 3000, 1.5)]
    out = np.zeros(N)
    for s, db in calls:
        for after, length, *pitch, note_db in notes:
            u = np.linspace(0, 1, int(length * SR))
            hz = np.polyval(np.polyfit([0, .5, 1], pitch, 2), u)
            start = int((s + after) * SR)
            whistle = np.sin(np.pi * u) * np.sin(2 * np.pi * np.cumsum(hz) / SR)
            out[start:start + len(u)] += amp(db + note_db) * whistle
    t = T[:SR // 4]
    echoes = signal.oaconvolve(out, noise(len(t)) * np.exp(-t / echo_s))[:N]
    return out + amp(echo_db) * echoes


def scene():
    """Direct and reflected sound: the truck is ahead; ground, fence and trees reflect differently to each side."""
    # spread of the clanks between the ears [frequency_hz, side_minus_mid_db]
    clank_width = [(60, -23), (200, -23), (500, -10), (1000, -7), (1300, -9), (1550, 3), (2200, -15.5),
                   (3200, -16), (4600, -19.5), (8500, -16.5), (13000, -22.5)]
    steel = spread(clanks(), clanks(), clank_width)
    balance = amp([[.15], [-.15]])
    return (engine() + steel + ticks() + bird()) * balance


def record(dry):
    """Transducer response: two ports colour and dephase the sound; peaks are rounded and the top is cut."""
    # response of the phone's microphone port [frequency_hz, gain_db]
    port_response = [(20, -12), (30, -3.5), (45, -0.5), (8000, 0), (9500, -3), (10500, -5), (11500, 0.5),
                     (14000, -1), (15500, -3.5)]
    # lead of the left port over the right [frequency_hz, phase_rad]
    port_phase = [(1200, 0), (2000, .3), (2900, .55), (3700, .3), (4400, 0), (5100, -.1), (5750, -.9),
                  (6500, -.15), (7400, -.15), (8400, -1.1), (9300, -2), (10100, -3.14), (11000, -4.7),
                  (12200, -5.9), (13400, -6.4), (15000, -7.9)]
    size = next_fast_len(N + SR // 10, True)
    lead = np.interp(np.fft.rfftfreq(size, 1 / SR), *np.transpose(port_phase))
    turn = np.exp(.5j * lead * np.array([[1], [-1]]))
    ports = irfft(rfft(dry, size) * turn, size)[:, :N]
    heard = np.array([colour(channel, port_response) for channel in ports])
    rounded = heard / (1 + (heard / .92) ** 6) ** (1 / 6)
    top_cut = signal.ellip(8, .2, 70, 15200, fs=SR, output="sos")  # edge in Hz
    return signal.sosfilt(top_cut, rounded)


dry = scene()
out = record(dry)
waveform_to_disk(out)
```